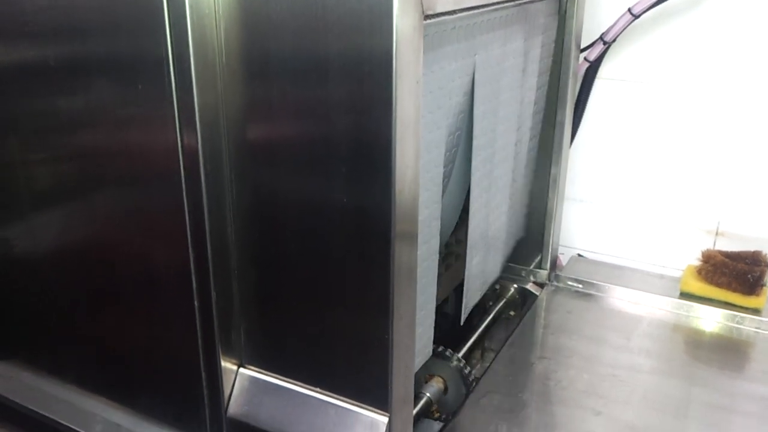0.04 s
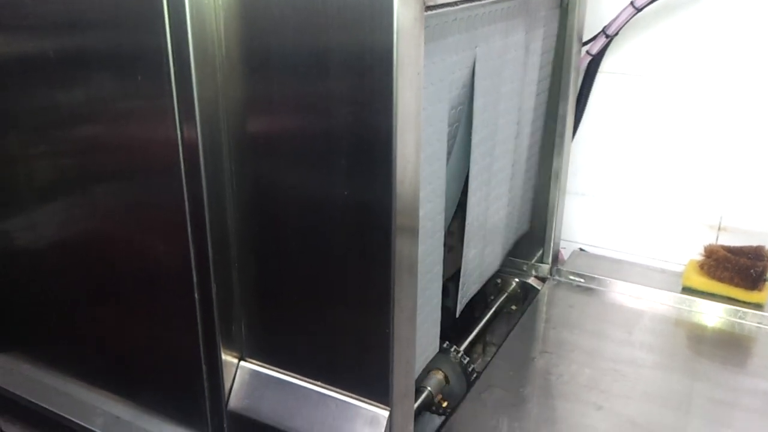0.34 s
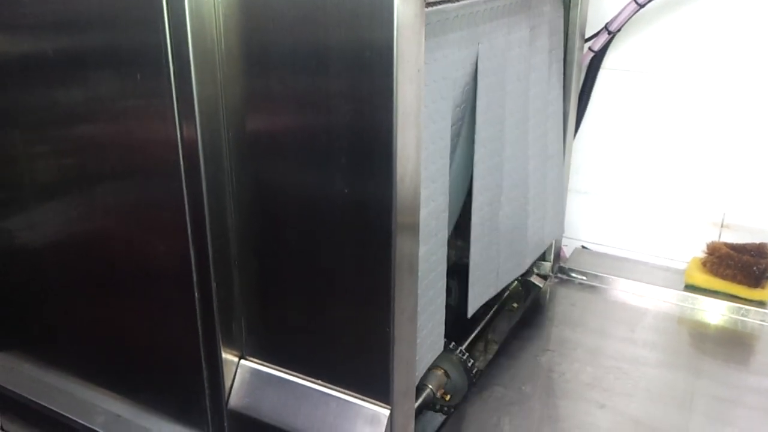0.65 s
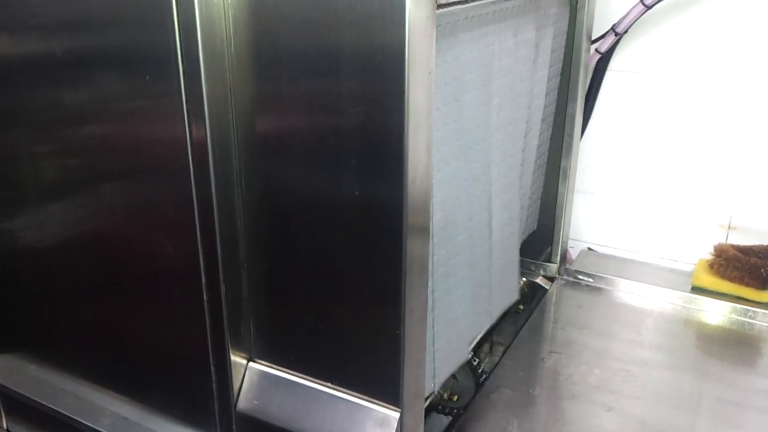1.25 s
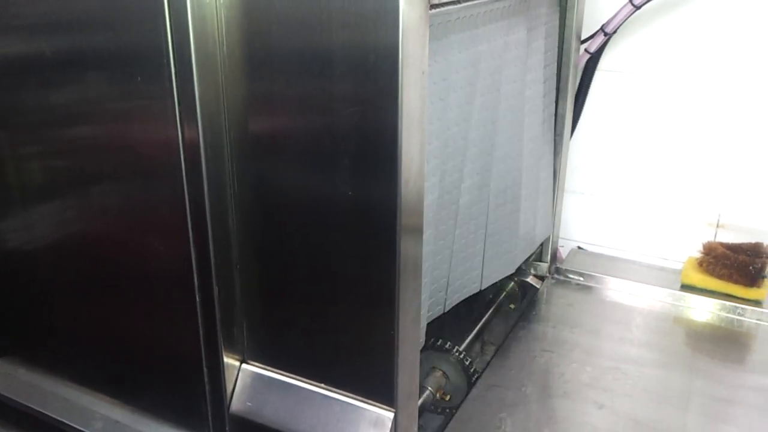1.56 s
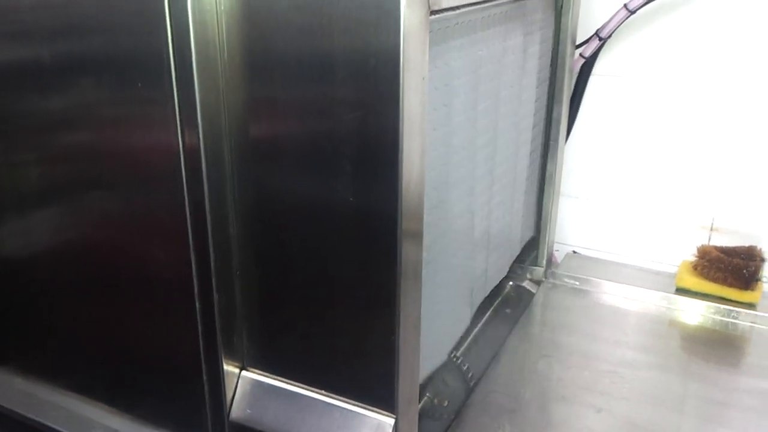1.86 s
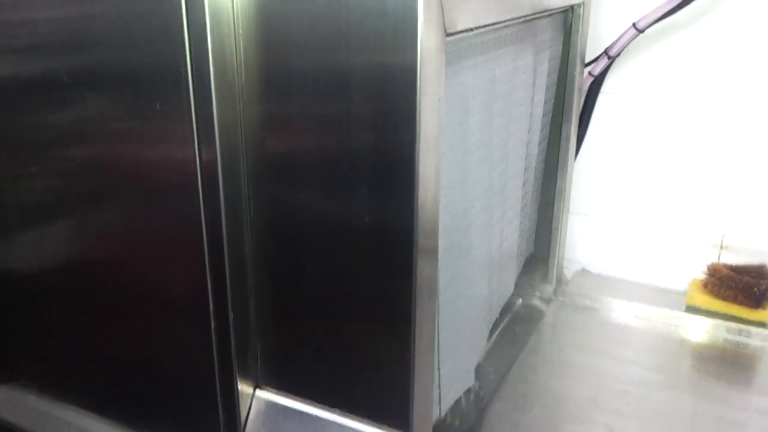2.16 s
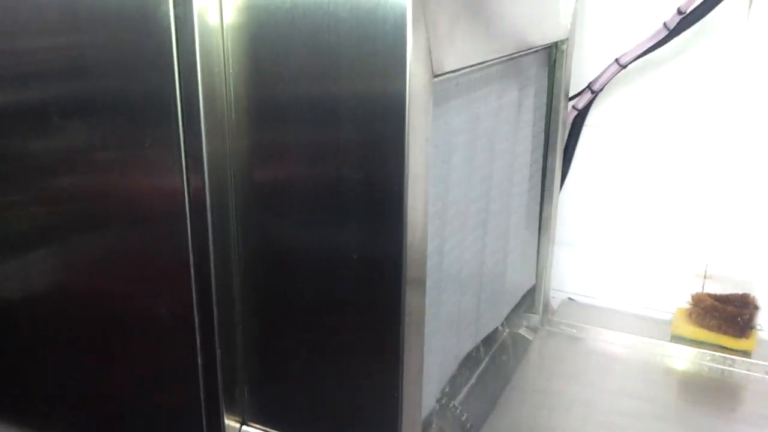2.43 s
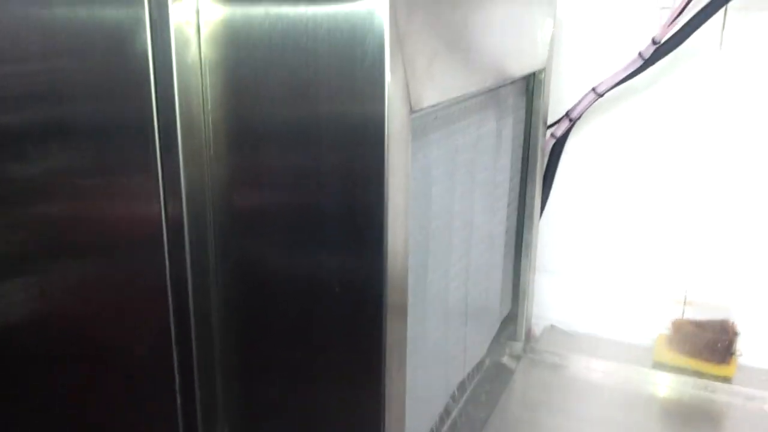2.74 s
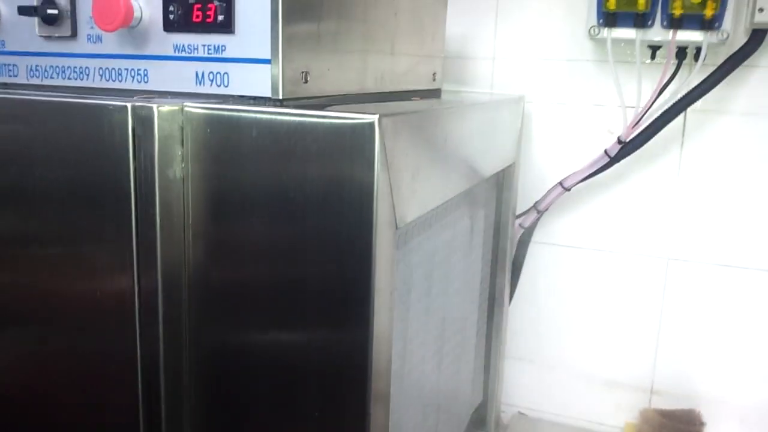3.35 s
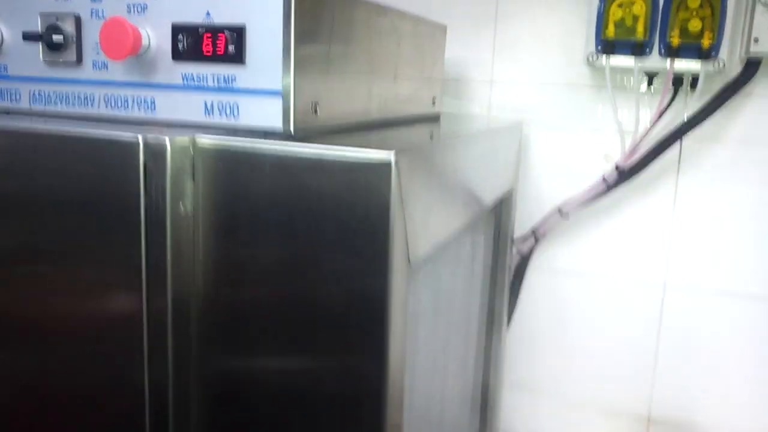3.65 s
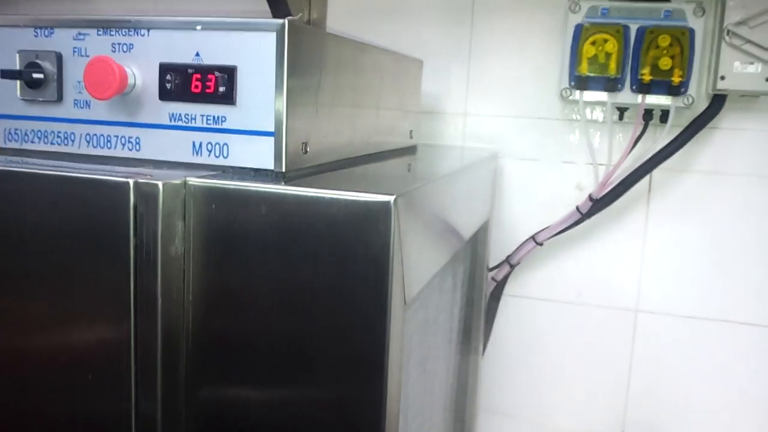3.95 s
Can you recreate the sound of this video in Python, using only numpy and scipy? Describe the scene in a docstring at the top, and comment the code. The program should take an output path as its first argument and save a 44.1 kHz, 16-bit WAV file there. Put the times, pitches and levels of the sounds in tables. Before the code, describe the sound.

Close to a running conveyor dishwasher in a kitchen, water booms on steel and slaps the curtain while crockery knocks and cutlery scrapes. Hissing, pattering spray takes over, with more knocks and chinks near the end.

```python
"""Water drums inside the steel tunnel of a conveyor dishwasher, loudest in the first second.
Spray hisses on the strip curtain and patters on the steel, and a few gushes slap the curtain.
Crockery knocks and rings in the racks, cutlery chinks and scrapes, and a rack bumps the steel.
A moving low-cut filter thins the bass, and a few soft, low blips sound underneath."""
import sys
import numpy as np
from scipy.fft import rfft, irfft
from scipy.io import wavfile

SR = 44100
rng = np.random.default_rng(int(sys.argv[2]) if len(sys.argv) > 2 else 0)


def wav_out(sig):
    """Save sig, one row per channel (or a flat mono array), as 16-bit PCM at SR to the path in sys.argv[1]."""
    wavfile.write(sys.argv[1], SR, np.round(np.clip(np.atleast_2d(sig).T, -1, 1) * 32767).astype(np.int16))


N = 176400
T = np.arange(N) / SR
HZ = np.maximum(np.fft.rfftfreq(N, 1 / SR), 1)


def drumming(boost_db=21):
    """Water jets beat on the tunnel walls, which boom at their own favourite pitches."""
    # how loud the drumming is, before the boost: t/s, level/dB
    loudness = [(0, -30), (.095, -23), (.16, -30), (.21, -29), (.25, -29), (.48, -25.5), (.72, -25),
                (.97, -24.5), (1.19, -34.5), (1.55, -38), (1.88, -34), (2.0, -38.5), (2.25, -34),
                (2.7, -32), (2.9, -31.5), (3.33, -34), (3.52, -32), (4, -34)]
    # its tone colour, from bass to treble: f/Hz, level/dB
    colour = [(30, -26), (80, -9), (135, -7), (230, -5), (400, -5.5), (650, -2), (1000, -4.5), (1700, -4),
              (2500, -6.5), (4500, -11), (7000, -13), (14000, -27.5)]
    # pitches the steel tunnel favours: f/Hz, width/Hz, lift/dB
    panels = [(318, 23, 4), (1108, 160, 2.5), (1228, 21, 6), (1876, 140, 1.5), (2700, 23, 5),
              (4400, 140, 5.5)]
    lift = sum(db / (1 + (2 * (HZ - hz) / width) ** 2) for hz, width, db in panels)
    water = noise(at_hz(colour) + lift, grain_db=-0.1)
    return from_db(boost_db + in_time(loudness)) * churn(water, patchy_db=1.48)


def spray(grain_db=-0.8):
    """Many tiny drops hiss on the curtain and patter on the steel, with a gush now and then."""
    # how loud the hiss on the curtain is: t/s, level/dB
    hiss_level = [(0, -21.5), (.5, -22), (.9, -20), (.97, -13), (1.2, -13), (1.6, -12), (1.9, -13),
                  (2.1, -15), (2.8, -14), (3.4, -15), (4, -14)]
    # tone colour of the hiss: f/Hz, level/dB
    hiss_colour = [(100, -44), (300, -8.5), (700, -13.5), (1300, -3.5), (2500, -4.5), (4200, -2.5),
                   (7000, -1), (10000, -1), (14500, -1.3)]
    # how loud the rinse jets patter: t/s, level/dB
    patter_level = [(0, -26), (.35, -11), (.6, -32), (.85, -20), (1.05, -13.5), (1.2, -15), (1.45, -13.5),
                    (1.8, -24), (2.15, -20), (2.6, -33), (2.95, -35), (3.5, -25), (4, -20)]
    # tone colour of the patter: f/Hz, level/dB
    patter_colour = [(100, -37), (1000, -4), (1700, -3), (2600, -6.5), (3600, -1), (4700, -1.5),
                     (6000, -15), (14000, -39)]
    # gushes slapping the curtain: t/s, level/dB, swell/s, fade/s
    gushes = [(0.22, -13.5, .004, 0.1), (0.334, -11.5, 0.0086, 0.25), (0.725, -10.5, 0.032, 0.3),
              (3.48, -20, .015, 0.28), (3.87, -19.5, .015, 0.15)]
    # tone colour of a gush: f/Hz, level/dB
    gush_colour = [(30, -22), (300, -6), (1500, 9), (3000, 4.5), (6000, 2), (14000, 0)]
    hiss = churn(noise(at_hz(hiss_colour), grain_db), patchy_db=1.22)
    patter = churn(noise(at_hz(patter_colour), grain_db=2), patchy_db=.6)
    gush_gain = sum(from_db(db) * burst(start, swell, fade) for start, db, swell, fade in gushes)
    slaps = gush_gain * noise(at_hz(gush_colour), grain_db)
    return from_db(in_time(hiss_level)) * hiss + from_db(in_time(patter_level)) * patter + slaps


def crockery(spread_cents=5, ring_fade_s=.14, focus_db_per_octave=15, dip_db=-7, dip_width_hz=50):
    """Each knock rattles the rack and rings a plate; where it is hit decides which tones stand out."""
    # knocks: t/s, rattle/dB, ring/dB, favoured f/Hz, rattle tilt/(dB per octave), swell/s, fade/s
    knocks = [(.015, -17, -10, 1800, 0, .01, .2), (.103, 2, -2, 3200, 1.5, .001, .085),
              (.109, -4, 0, 4940, 3, .0022, .22), (.111, -10, -1, 2100, 1, .002, .08),
              (.134, -10, -4.5, 2900, 4.5, .003, .14), (.172, -6, -6, 1850, 2, .0033, .09),
              (.26, -3.5, -6, 1830, 2, .004, .075), (.281, -3.5, -7, 1900, 2, .004, .075),
              (.333, -3, -4.5, 1830, 1.5, .0035, .1), (.346, -1.5, -1.5, 1110, -1.1, .0027, .25),
              (.636, -11, -34, 1200, -3.5, .004, .087), (2.795, -7, -10, 2900, -.7, .006, .2),
              (2.835, -17, -15, 1310, -2, .008, .2), (2.963, -5, -5, 2880, 0, .002, .085),
              (2.988, -15, -12, 1310, -1.5, .008, .25), (3.458, -11, -10, 2050, -.3, .015, .27),
              (3.815, -13, -15, 2550, 4, .025, .25)]
    # tones of a plate: f/Hz, level/dB
    plate = [(1135, -1.5), (1310, -9), (1785, -12), (1862, -5.5), (2015, -2.5), (2160, -9), (2550, -11),
             (2855, -7), (2905, 0), (3590, -17), (3802, -9.5), (4904, -3.5), (8725, -12)]
    # tone colour of the rattle: f/Hz, level/dB
    rattle_colour = [(30, -60), (120, -36), (300, -6), (600, -2.5), (1100, 3.5), (1900, 5), (3200, -3.5),
                     (5000, -9.5), (7000, -12), (14000, -28)]
    out = 0
    for start, rattle_db, ring_db, focus_hz, tilt, swell, fade in knocks:
        tuning = 2 ** (spread_cents * rng.uniform(-1, 1) / 1200)  # no two plates are quite alike
        tones = [(hz * tuning, db - focus_db_per_octave * abs(np.log2(hz / focus_hz)), ring_fade_s)
                 for hz, db in plate]
        # the rattle is weaker at the pitches where the plate rings
        dips = sum(dip_db * from_db(db) / (1 + (2 * (HZ - hz) / dip_width_hz) ** 2)
                   for hz, db, _ in tones)
        colour = at_hz(rattle_colour) + dips + tilt * np.log2(HZ / 2000)
        rattle = from_db(rattle_db) * burst(start, swell, fade) * noise(colour, grain_db=2.5)
        out = out + rattle + ring(tones, start, ring_db)
    return out


def cutlery(chink_boost_db=2.5, shimmer_ratio=2.58, shimmer_fade_s=.19):
    """Steel slides on steel in short scrapes, and rings with a bright chink when struck."""
    # scrapes: t/s, level/dB, pitch ratio, swell/s, fade/s
    scrapes = [(.221, -6.5, 1.05, .0046, 0.12), (.305, -11, 1, 0.011, 0.56), (.42, -14, 1.12, 0.027, 0.43),
               (.537, -10.5, 0.91, 0.018, .25), (.745, -14, 1.08, .025, .45),
               (3.098, -12, 0.974, 0.014, 0.63), (3.475, -12.5, 1.16, 0.013, .4),
               (3.795, -9, 0.91, 0.048, 0.26)]
    # tone colour of a scrape at pitch ratio 1: f/Hz, level/dB
    scrape_colour = [(100, -48), (2500, 1), (3600, -38), (3950, 5), (4450, -1.5), (5000, 0), (5800, -7),
                     (14000, -63)]
    # chinks: t/s, level before the boost/dB, main f/Hz, high shimmer against the main tone/dB
    chinks = [(.35, -20, 4990, -30), (.355, -14, 4100, -14), (.538, -14.5, 4205, -13), (.552, -22, 4215, 3),
              (.568, -15, 4199, -8), (.762, -21, 4530, -20), (2.98, -18.5, 4100, -18),
              (3.115, -23, 3960, -18), (3.84, -21, 4270, -18)]
    # tones of a piece of cutlery: pitch ratio, level/dB, fade/s
    piece = [(.715, -6, .22), (1, 0, .21), (1.022, -9, .15)]
    out = 0
    for start, db, ratio, swell, fade in scrapes:
        colour = at_hz([(hz * ratio, level) for hz, level in scrape_colour])
        out = out + from_db(db) * burst(start, swell, fade) * noise(colour, grain_db=-2.5)
    for start, db, hz, shimmer_db in chinks:
        tones = [(hz * ratio, level, fade) for ratio, level, fade in piece]
        tones.append((hz * shimmer_ratio, shimmer_db, shimmer_fade_s))
        out = out + ring(tones, start, db + chink_boost_db)
    return out


def rack_bumps():
    """A rack nudges the steel, which answers with a dull note."""
    # soft bumps: t/s, level/dB
    bumps = [(.232, -9.5), (.315, -12.5), (.515, -8.5), (.55, -16), (.715, -9.5)]
    # tones of the steel panel: f/Hz, level/dB, fade/s
    panel_tones = [(464, -9.5, 0.17), (553, -13, 0.11), (618, -11, 0.28), (690, -19, 0.12), (794, -7, 0.15)]
    return sum(ring(panel_tones, start, db) for start, db in bumps)


def low_blips(rise_per_s=1.6, right_db=-7):
    """A few soft, low blips near the bass edge, each rising a little in pitch."""
    # blips: t/s, level/dB, starting f/Hz
    blips = [(.56, -25, 105), (1.191, -38, 169), (2.449, -32.5, 144), (2.199, -28.5, 180),
             (2.765, -24.5, 181), (3.64, -32.5, 130)]
    out = 0
    for start, db, hz in blips:
        age = np.maximum(T - start, 0)
        phase = 2 * np.pi * (hz * age * (1 + rise_per_s * age / 2) + rng.random())
        out = out + from_db(db) * burst(start, swell_s=.02, fade_s=.2) * np.sin(phase)
    return np.array([out, -from_db(right_db) * out])  # the right wave is softer and upside down


def from_db(db):
    """Turn decibels into a number to multiply the sound by."""
    return 10 ** (np.asarray(db) / 20)


def in_time(rows):
    """Join a table's points with straight lines, giving a value at every sample."""
    return np.interp(T, *np.transpose(rows))


def at_hz(rows, column=1):
    """Join a table's points, giving a value at every frequency."""
    rows = np.array(rows)
    return np.interp(np.log(HZ), np.log(rows[:, 0]), rows[:, column])


def drift(rate_hz):
    """A smooth random wiggle of typical size 1; a higher rate wiggles faster."""
    wiggle = irfft(rfft(rng.standard_normal(N)) / (1 + (HZ / rate_hz) ** 2), N)
    return (wiggle - wiggle.mean()) / wiggle.std()


def noise(colour_db, grain_db):
    """Stereo noise of a given tone colour, made grainy by a fast flicker like that of single drops."""
    # how alike left and right are: f/Hz, likeness (-1 opposite, 1 the same)
    likeness = [(50, -0.93), (250, -0.72), (700, -0.56), (1100, -0.23), (1800, -0.043), (2700, -0.11),
                (4500, -0.033), (14000, 0.063)]
    grain = from_db(grain_db * drift(rate_hz=500))
    mid, side = rfft(rng.standard_normal((2, N)) * grain)
    alike = at_hz(likeness)
    stereo = np.sqrt(1 + alike) * mid + np.sqrt(1 - alike) * side * [[1], [-1]]
    return irfft(from_db(colour_db) * stereo, N)


def churn(x, patchy_db, bands=14):
    """Water sloshes: each band of pitches flickers by itself, and all surge together."""
    place = np.interp(np.log(HZ), np.log([100, 14000]), [0, bands - 1])
    spectrum = rfft(x)
    surge = 0.43 * drift(rate_hz=6.6)
    out = 0
    for k in range(bands):
        band = irfft(spectrum * np.maximum(1 - abs(place - k), 0), N)
        out = out + band * from_db(patchy_db * (surge + drift(rate_hz=9.1)))
    return out


def burst(start, swell_s, fade_s):
    """A loudness curve that swells, then dies away; a fade time is how long it takes to fall 60 dB."""
    age = np.maximum(T - start, 0)
    fall_db = -60 * np.clip((age - swell_s) / fade_s, 0, 3)
    return np.minimum(age / swell_s, 1) * from_db(fall_db)


def ring(tones, start, db, swell_s=.004, waver_db=2, wobble_rad=.7):
    """A struck object's tones die away; reflections make each waver differently left and right."""
    out, first = np.zeros((2, N + SR)), int(start * SR)
    age, knots = T[:SR // 2], np.linspace(0, .5, 50)
    for hz, tone_db, fade in tones:
        for side in out:
            waver, wobble = (np.interp(age, knots, k) for k in rng.standard_normal((2, len(knots))))
            level = db + tone_db + waver_db * waver - 60 * age / fade
            phase = 2 * np.pi * (hz * age + rng.random()) + wobble_rad * wobble
            side[first:first + len(age)] += from_db(level) * np.sin(phase) * np.minimum(age / swell_s, 1)
    return out[:, :N]


def thin_bass(x, waver_octaves=.07, leak_db=-42):
    """A steep low-cut filter turns down the bass below an edge that moves and wavers."""
    # where the edge lies: t/s, f/Hz
    bass_edge = [(0, 139), (.12, 100), (.18, 201), (.24, 113), (.45, 135), (.58, 95), (.9, 133), (1.1, 171),
                 (1.3, 288), (1.6, 262), (1.95, 292), (2.2, 167), (2.65, 202), (2.78, 165), (2.9, 205),
                 (3.4, 178), (3.66, 154), (4, 183)]
    edges_hz = np.geomspace(70, 360, 12)
    octave = np.log2(in_time(bass_edge)) + waver_octaves * drift(rate_hz=13)
    place = np.interp(octave, np.log2(edges_hz), np.arange(len(edges_hz)))
    spectrum = rfft(x)
    out = 0
    for k, hz in enumerate(edges_hz):  # blend the two filters nearest the moving edge
        low_cut = 1 / (1 + (hz / HZ) ** 14) + from_db(leak_db)
        out = out + irfft(spectrum * low_cut, N) * np.maximum(1 - abs(place - k), 0)
    return out


def scene():
    """A moving low-cut filter thins the bass of the machine's sounds; soft, low blips sound beneath."""
    return thin_bass(drumming() + spray() + crockery() + cutlery() + rack_bumps()) + low_blips()


def record(dry, ceiling=1.03, cutoff_hz=14600):
    """Two microphones colour the sound, squash the loudest knocks and lose the highest treble."""
    # tone colour of the microphones: f/Hz, left/dB, right/dB
    mics = [(149, -4.5, -11.5), (423, 2.5, -2), (980, -1.5, -2), (2280, -3.5, -2), (3290, -2.5, 1),
            (4230, -4, 3.5), (5060, -3.5, 2), (6580, -6.5, -8.5), (8090, -0.5, -5.5), (9610, 6.5, -5),
            (10850, 9.5, -6), (12180, 7, -6.5), (17000, -10, -15)]
    coloured = irfft(rfft(dry) * from_db([at_hz(mics, column=1), at_hz(mics, column=2)]), N)
    squashed = coloured / (1 + (coloured / ceiling) ** 16) ** (1 / 16)
    return irfft(rfft(squashed) / np.sqrt(1 + (HZ / cutoff_hz) ** 400), N)


dry = scene()
out = record(dry)
wav_out(out)
```